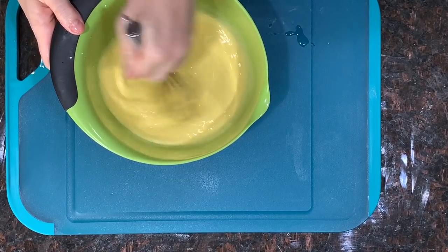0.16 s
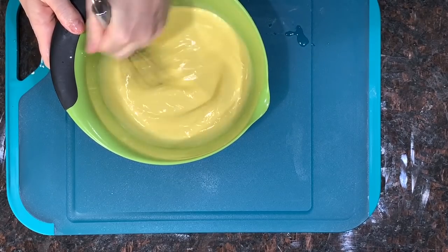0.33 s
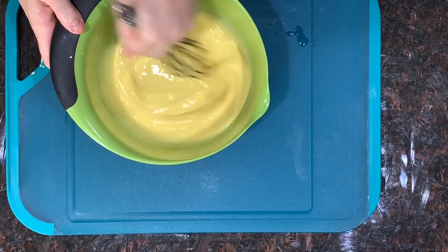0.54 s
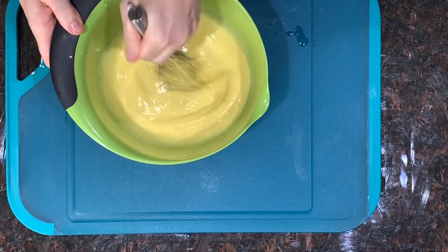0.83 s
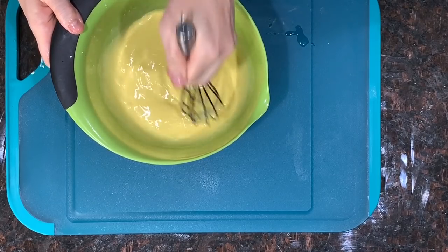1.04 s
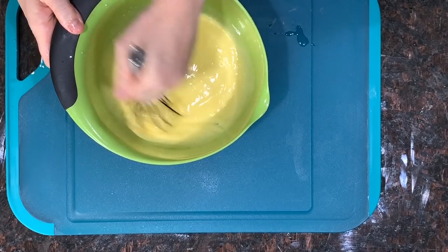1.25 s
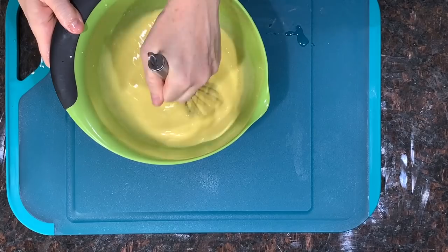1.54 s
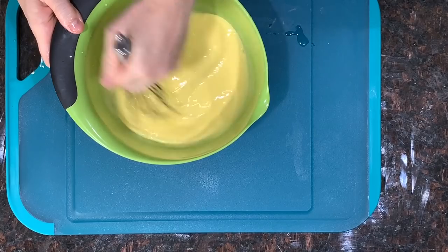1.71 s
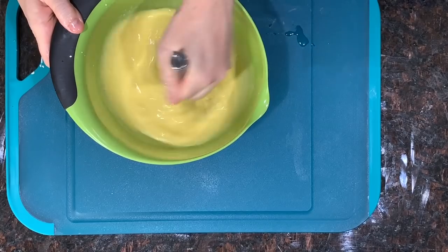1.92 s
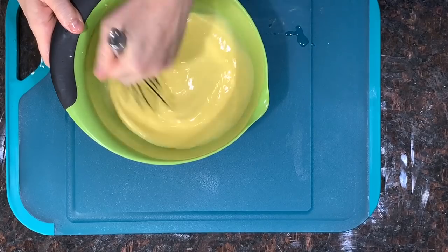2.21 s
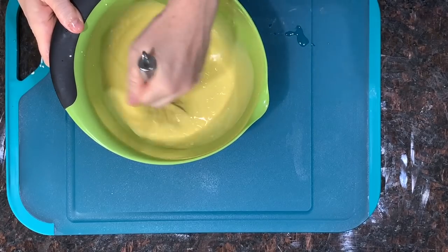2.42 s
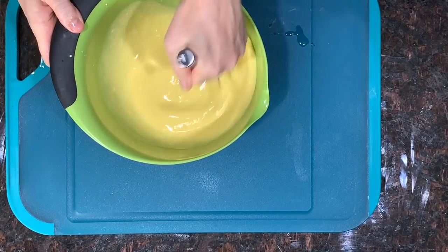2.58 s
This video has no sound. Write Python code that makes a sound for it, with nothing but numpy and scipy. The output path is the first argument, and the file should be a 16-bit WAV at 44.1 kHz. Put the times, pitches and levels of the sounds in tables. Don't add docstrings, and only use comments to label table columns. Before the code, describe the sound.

Close microphone on hand whisking: thin wires click against a plastic bowl and drag through wet batter with bubbly gurgles and small plops. Moderate at first, softer midway, then vigorous strokes; small kitchen echo and quiet hum.

```python
import sys
import numpy as np
from scipy import signal
from scipy.io import wavfile
from scipy.ndimage import uniform_filter1d

SR = 44100
rng = np.random.default_rng(int(sys.argv[2]) if len(sys.argv) > 2 else 0)


def waveform_to_disk(signal):
    frames = np.transpose(np.atleast_2d(signal))
    scaled = np.clip(frames, -1, 1) * 32767
    samples = np.round(scaled).astype(np.int16)
    wavfile.write(sys.argv[1], SR, samples)


def level_to_linear(level):
    exponent = np.asarray(level, float) / 20
    return 10 ** exponent


N = 121275


def evened(x):
    return x / np.sqrt(np.mean(x ** 2) + 1e-20)


def read(points, hz):
    f, value = np.transpose(points)
    return np.interp(np.log(hz + 1), np.log(f + 1), value)


def add(mix, start_s, sound):
    at = round(start_s * SR)
    part = mix[max(at, 0):][:len(sound) + min(at, 0)]
    part += sound[max(-at, 0):][:len(part)]


def causal(colour_db):
    log_gain = np.log(level_to_linear(np.maximum(colour_db, -90)))
    full = np.concatenate([log_gain, log_gain[-2:0:-1]])
    spectrum = np.exp(np.conj(signal.hilbert(full)))
    return np.fft.ifft(spectrum).real[:len(log_gain)]


def room_air():
    # frequency in Hz, level in dB.
    air_colour = [(25, 8), (70, -9), (130, 3.5), (450, -12.5), (900, -15), (3500, -30), (8000, -32),
                  (16000, -59)]
    level_db, patch_db = -56.5, 5.2
    frames, hz = N // 256 + 5, np.fft.rfftfreq(1024, 1 / SR)
    a, b, patches = rng.standard_normal((frames, 513, 3)).T
    patches = uniform_filter1d(patches, size=10, axis=0)
    patches = evened(uniform_filter1d(patches, size=10, axis=1))
    z = (a + 1j * b) * level_to_linear(read(air_colour, hz)[:, None] + patch_db * patches)
    air = signal.istft(z, nperseg=1024, noverlap=768)[1][:N]
    return level_to_linear(level_db) * evened(air)


def thud():
    centre_hz, width_hz, level_db, swell_db = 50.3, 41, -59, 0.5
    noise, slow = rng.standard_normal((2, N))
    r, w = np.exp(-np.pi * width_hz / SR), 2 * np.pi * centre_hz / SR
    poles = [1, -2 * r * np.cos(w), r * r]
    low = signal.lfilter([1, -1], poles, noise)
    low = signal.lfilter([1], poles, low)
    swell = evened(uniform_filter1d(slow, size=4000))
    return level_to_linear(level_db + swell_db * swell) * evened(low)


def kitchen(x):
    # frequency in Hz, t60 in seconds.
    decay = [(300, 0.39), (4000, 0.14), (8000, 0.42), (15000, 0.2)]
    taps = np.zeros(SR // 2)
    at = np.arange(150, SR // 2 - 20, 20)
    taps[at + rng.integers(0, 20, len(at))] = rng.choice([-1., 1.], len(at))
    hz, t, z = signal.stft(taps, SR, nperseg=256)
    z = z * level_to_linear(-60 * t / read(decay, hz)[:, None])
    tail = signal.istft(z, SR, nperseg=256)[1]
    return signal.fftconvolve(x, tail / np.linalg.norm(tail))[:N]


def plop(start_s, peak_db, hz, t60):
    t = np.arange(0, t60 + .01, 1 / SR)
    tone = np.sin(2 * np.pi * hz * t * (1 + 0.77 * t))
    onset = np.minimum(t * hz, 1)
    return start_s + 0.00086, tone * onset * level_to_linear(peak_db - 60 * t / max(t60, .004))


def knocks():
    # start in seconds, peak in dB, pitch in Hz, t60 in seconds.
    pockets = [(0.136, -34.5, 1160, 0.063), (0.509, -23.5, 729, 0.062), (0.742, -27.5, 758, 0.035),
               (1.33, -34.5, 240, 0.06), (1.816, -29.5, 467, 0.046), (2.03, -20.5, 620, 0.015),
               (2.138, -31, 247, 0.095), (2.317, -24.5, 473, 0.02), (2.651, -22.5, 630, 0.033),
               (2.663, -17.5, 574, 0.012), (2.718, -29.5, 167, 0.054)]
    # start in seconds, peak in dB, pitch in Hz, t60 in seconds.
    bumps = [(0.339, -23, 327, 0.017), (0.507, -30.5, 486, 0.02), (0.59, -37, 264, 0.03),
             (0.809, -36, 250, 0.03), (1.132, -44, 54, 0.44), (1.6, -38, 306, 0.03),
             (1.1, -39, 268.5, 0.035), (1.656, -39.5, 490, 0.037), (2.104, -39.5, 142.4, 0.21),
             (2.199, -33.5, 61.5, 0.14), (2.651, -26.5, 323, 0.035), (2.664, -24.5, 340, 0.025)]
    # start in seconds, peak in dB, pitch in Hz, t60 in
    # seconds.
    more_pockets = [(0.122, -34, 434, 0.023), (0.239, -37.5, 370, 0.033), (0.275, -28.5, 650, 0.024),
                    (0.319, -28, 446, 0.024), (0.338, -20.5, 710, 0.015), (0.347, -31.5, 650, 0.028),
                    (0.681, -31.5, 790, 0.018), (0.7, -29, 302, 0.024), (0.886, -35.5, 416, 0.053),
                    (1.162, -44, 678, 0.028), (1.204, -35, 725, 0.034), (1.481, -34, 890, 0.031),
                    (1.532, -34, 476, 0.018), (1.565, -29, 266, 0.02), (1.76, -26.5, 415, 0.018),
                    (1.969, -29, 675, 0.036), (2.212, -35, 686, 0.018), (2.257, -22.5, 410, 0.028),
                    (2.394, -29, 655, 0.038), (2.438, -26, 912, 0.018), (2.464, -28, 640, 0.022),
                    (2.499, -28, 656, 0.029), (2.711, -33.5, 664, 0.029)]
    out = np.zeros(N)
    for row in pockets + bumps + more_pockets:
        add(out, *plop(*row))
    return out


def gurgle(whisk):
    level_db, pockets_per_s, tilt_db = -16, 260, -10.5
    stir = np.abs(uniform_filter1d(whisk ** 2, size=6000)) ** 0.43
    out = np.zeros(N)
    for when, pitch, size, life in rng.random((round(pockets_per_s * N / SR), 4)):
        hz = 200 * 9 ** pitch
        peak_db = level_db + 7.7 * size + tilt_db * pitch
        add(out, *plop(when * N / SR, peak_db, hz, (7.6 + 6 * life) / hz))
    return out * stir


def crackle(length, hiss_db):
    grains_per_s, grain_cycles, spread_db = 2200, 4.5, 3.5
    chance, small, pitch = rng.random((length, 3)).T
    size_db = -spread_db * np.maximum(np.log(small + 1e-9), -3)
    size = (chance < grains_per_s / SR) * level_to_linear(size_db)
    hz = np.geomspace(300, 15000, 12)[:, None]
    kind = np.arange(len(hz))[:, None]
    turns = hz * np.arange(1024) / SR
    blips = np.sin(2 * np.pi * turns) * np.exp(-2 * turns / grain_cycles)
    blips *= hz ** 0.91 / (kind + 1)
    trains = size * (np.floor(pitch ** .6 * len(hz)) == kind)
    bubbles = signal.fftconvolve(trains, blips, axes=1).sum(0)[:length]
    return evened(bubbles) + level_to_linear(hiss_db) * rng.standard_normal(length)


def hump(centre_hz, octaves, above_db):
    # frequency in Hz, level in dB.
    bowl_colour = [(100, -25), (250, 6), (700, -10.5), (1100, -3), (2000, -5.5), (8100, -3.5), (11000, -13),
                   (16000, -14)]
    ripple_db, below_db = 1.8, 30
    hz = np.fft.rfftfreq(1024, 1 / SR)
    off = np.log2((hz + 30) / centre_hz) / octaves
    ripple = uniform_filter1d(rng.standard_normal(len(hz)), size=24)
    ripple = evened(uniform_filter1d(ripple, size=16))
    ripple *= np.minimum(2 * abs(off), 1)
    fall_db = np.minimum(6 * off ** 2, np.where(off > 0, above_db, below_db))
    return causal(read(bowl_colour, hz) + ripple_db * ripple - fall_db)


def stroke(start_s, length_s, level_db, hz):
    t = np.arange(0, length_s, 1 / SR)
    swell = np.sin(np.pi * (t / length_s) ** 0.62) ** 1.12
    colour = hump(hz, octaves=1.47, above_db=14.0)
    wet = signal.fftconvolve(crackle(len(t), hiss_db=5), colour)[:len(t)]
    return start_s, level_to_linear(level_db) * evened(wet) * swell


def tick(start_s, peak_db, hz, splash_db):
    click_db, ring_db, spray_db, body_db, lead_db = -3.5, -10, -7.5, -17, -16.5
    ring_t60, spray_t60, body_t60 = 0.012, 0.045, 0.051
    wires_s, lead_s, body_lead_s = .0004, 0.004, 0.011
    t = np.arange(-.03, .08, 1 / SR)
    after, at = np.maximum(t, 0), np.argmax(t >= 0)
    noise = rng.standard_normal(len(t))
    colour = hump(hz, octaves=1.43, above_db=3.5)

    wires = np.convolve(colour, noise[:100] * np.exp(-np.arange(100) / SR / wires_s))
    click = np.pad(wires / abs(wires).max(), (at, len(t) - len(wires) - at))
    ring = np.sin(2 * np.pi * hz * after) * level_to_linear(-60 * after / ring_t60)

    lead = level_to_linear(lead_db) * np.exp(t / lead_s)
    shape = np.where(t < 0, lead, level_to_linear(spray_db - 60 * after / spray_t60))
    spray = signal.fftconvolve(crackle(len(t), hiss_db=0.5), colour)[:len(t)]
    spray = evened(spray) * shape / 2

    band = signal.butter(2, [300, 1500], "band", fs=SR, output="sos")
    body = evened(signal.sosfilt(band, noise))
    body *= np.where(t < 0, np.exp(t / body_lead_s) * 0.23, 1)
    body *= level_to_linear(body_db - 60 * after / body_t60)

    strike = level_to_linear(click_db) * click + level_to_linear(ring_db) * ring
    return start_s + t[0] + 0.000979, level_to_linear(peak_db) * (strike + level_to_linear(splash_db) * (spray + body))


def whisking():
    # start in seconds, peak in dB,
    # ring in Hz, splash in dB against the click.
    ticks = [(0.0409, -27.5, 1620, 4.5), (0.135, -18, 8390, -6), (0.167, -23.5, 5800, -6),
             (0.1808, -23, 2070, -15), (0.224, -34, 2260, 4.5), (0.263, -26.5, 2320, -22),
             (0.269, -15, 8600, -8), (0.32, -28, 7900, 2.5), (0.343, -32, 7700, 2),
             (0.3988, -27.5, 6860, -10.5), (0.4449, -25, 3700, -9), (0.4885, -23, 7500, -4.5),
             (0.5286, -27.5, 2220, -4), (0.5851, -26.5, 6660, -6.5), (0.645, -25.5, 2020, -12),
             (0.6788, -21, 2000, -3.5), (0.701, -23.5, 2280, 1), (0.7443, -19.5, 2180, -1.5),
             (0.8094, -20.5, 8500, -10.5), (0.831, -30, 4030, 9), (0.8857, -23, 2250, -7),
             (0.8976, -18.5, 3650, -3), (1.0231, -32.5, 3640, 0.5),
             (1.0568, -24.5, 1930, -14), (1.0792, -22.5, 8000, -6), (1.112, -25.5, 2340, 2.5),
            (1.2061, -20.5, 2770, -2.5), (1.2303, -25.5, 7300, -7), (1.2444, -38.5, 5300, 13),
            (1.285, -43.5, 1930, 7.5), (1.322, -22.5, 2050, -0.5), (1.3406, -17, 2100, -6.5),
            (1.3712, -22.5, 4330, -12), (1.3962, -27.5, 3920, 1.5), (1.434, -21.5, 4730, -3.5),
            (1.483, -17.5, 5060, -4), (1.5335, -27, 2210, -1), (1.626, -26.5, 4440, -1),
            (1.782, -18.5, 8000, -1.5), (1.8175, -19, 1900, 0.5), (1.8509, -17.5, 3270, -5),
            (1.9095, -16.5, 1860, -7), (1.949, -19, 3600, -17), (1.9611, -18, 7700, -1),
            (1.9927, -17, 3300, 0.5),
             (2.0379, -17.5, 8350, 0), (2.075, -15, 3000, -5), (2.0897, -10, 4720, -10),
              (2.1099, -16, 2600, -9.5), (2.155, -14.5, 7320, -6), (2.2138, -12.5, 4350, -7.5),
              (2.254, -10, 7100, -9.5), (2.2575, -8, 3760, -5.5), (2.3208, -14.5, 2380, 0.5),
              (2.4106, -19.5, 1770, 2.5), (2.4391, -21.5, 3170, -4), (2.4782, -5, 5730, -15.5),
              (2.494, -9.5, 1630, -6.5), (2.5517, -11, 2120, -22.5), (2.5758, -13.5, 2070, -13.5),
              (2.5835, -10, 9460, -9.5), (2.6343, -12.5, 2300, -17), (2.6417, -12, 1880, -3.5),
              (2.6536, -11, 8520, -2.5), (2.6642, -13.5, 8100, -8.5), (2.7079, -11, 4030, -7.5),
              (2.714, -15, 2240, -19),
             (.2957, -14.5, 4070, -0.5),
        (1.4683, -25, 7400, -8),
        (1.9797, -11, 4740, -7),
             (0.019, -37.5, 1720, -4), (0.2761, -31, 2970, -1), (0.2808, -20, 1770, -5),
             (0.439, -33.5, 2100, -13), (0.509, -24, 1940, -2), (0.6834, -26.5, 6400, -3),
             (1.0964, -29.5, 1800, -5), (1.5418, -24, 2250, -6), (1.556, -26.5, 7900, -0.5),
             (1.5657, -27, 1300, -7), (1.5803, -36, 1520, -7), (1.623, -31.5, 7100, 1),
             (1.6573, -34, 7150, -3), (1.758, -35, 2480, 3), (1.7654, -24, 3030, -5),
             (1.7741, -23, 7360, -1.5), (1.794, -24, 3700, 5), (1.9717, -20, 1670, 3),
             (2.0057, -21, 8000, 4), (2.0505, -19, 2930, 0), (2.1217, -16, 2570, 0),
             (2.1736, -18, 2480, -4), (2.384, -27.5, 1670, -4), (2.4444, -19, 3060, -13),
             (2.4517, -15, 3670, -20), (2.461, -19, 1560, -4), (2.5024, -17.5, 1640, -10),
             (2.5436, -9, 1970, -12), (2.6172, -22.5, 4100, -4)]
    # start in seconds, length in seconds, level in dB, centre in Hz.
    strokes = [(0.225, 0.034, -49, 2000), (0.267, 0.067, -40, 1620), (0.432, 0.052, -50, 3000),
               (0.574, 0.054, -51.5, 5000), (0.593, 0.023, -54.5, 1800), (0.805, 0.036, -47, 2460),
               (0.874, 0.059, -39.5, 3300), (1.053, 0.1, -48.5, 2590), (1.145, 0.038, -53, 597),
               (1.209, 0.09, -54.5, 1180), (1.312, 0.16, -54, 2550), (1.534, 0.074, -46, 1030),
               (1.75, 0.13, -48.5, 3380), (1.836, 0.31, -48, 2220), (1.957, 0.082, -32, 2650),
               (2.031, 0.049, -35, 3580), (2.084, 0.11, -36.5, 3600), (2.375, 0.06, -41.5, 1140),
               (2.424, 0.13, -35, 2930), (2.539, 0.076, -39, 2050)]
    out = np.zeros(N)
    for row in ticks:
        add(out, *tick(*row))
    for row in strokes:
        add(out, *stroke(*row))
    return out


def scene():
    background = room_air() + thud()
    whisk = whisking()
    echoes = level_to_linear(-12.5) * kitchen(whisk)
    return (background + echoes + gurgle(whisk) + knocks() + whisk)[None]


def roll_off(x):
    return signal.sosfilt(signal.butter(12, 16670, fs=SR, output="sos"), x)


def record(dry):
    low_pass = signal.firwin(81, 15500, fs=SR)
    mix = signal.oaconvolve(dry, low_pass[None], "same")
    return roll_off(mix)


dry = scene()
out = record(dry)
waveform_to_disk(out)
```